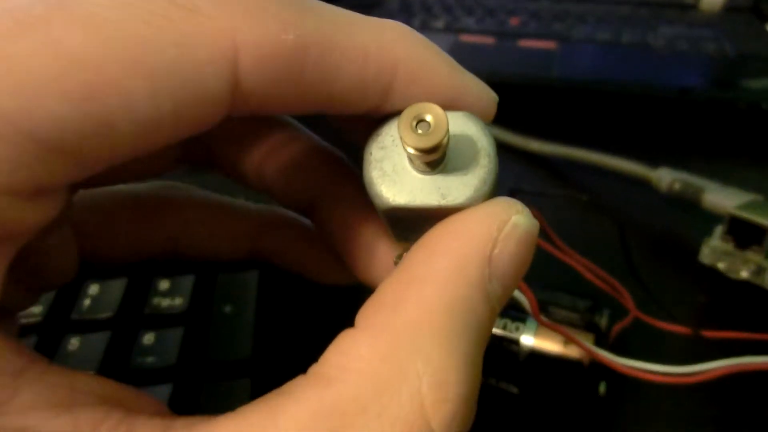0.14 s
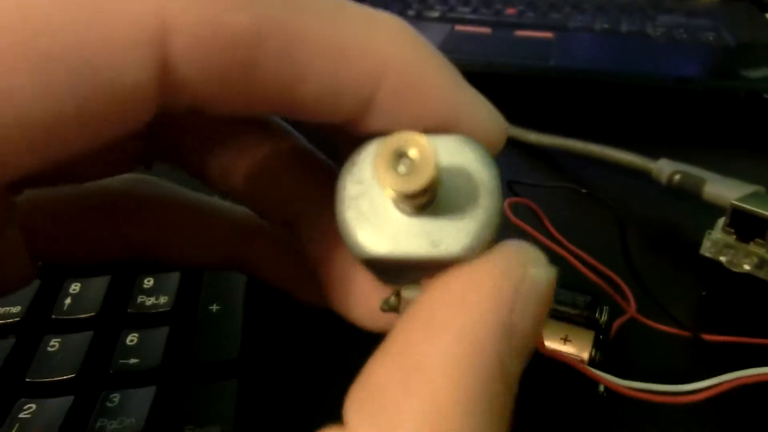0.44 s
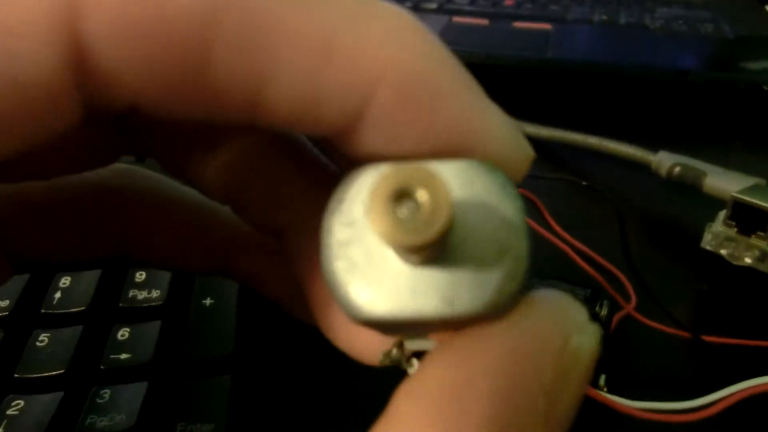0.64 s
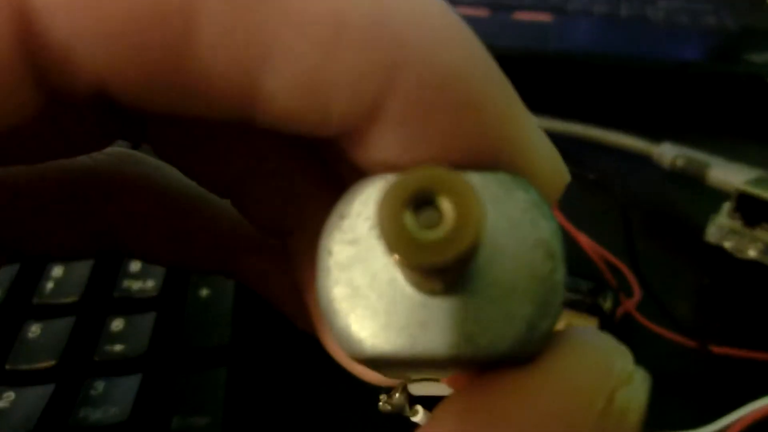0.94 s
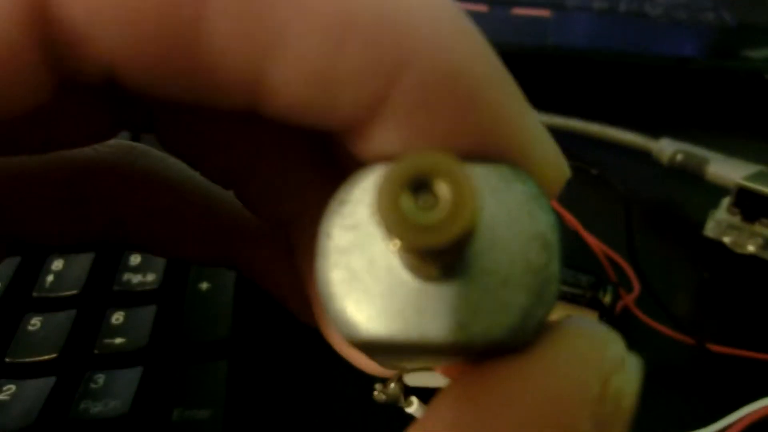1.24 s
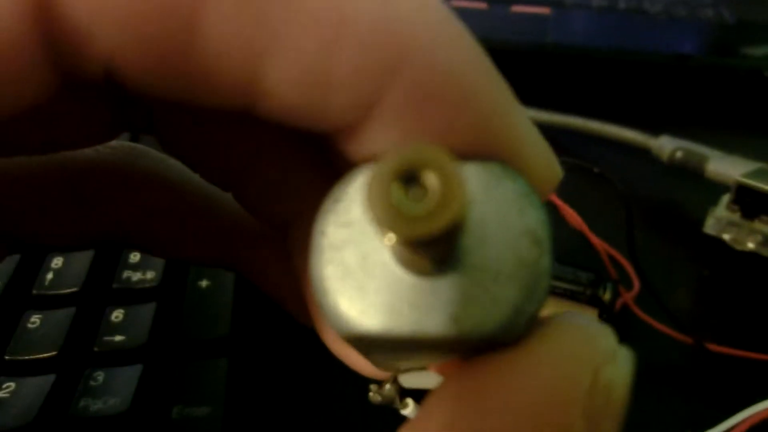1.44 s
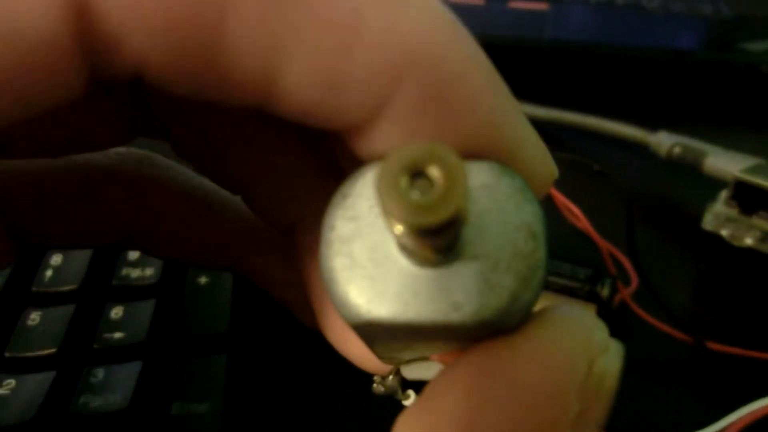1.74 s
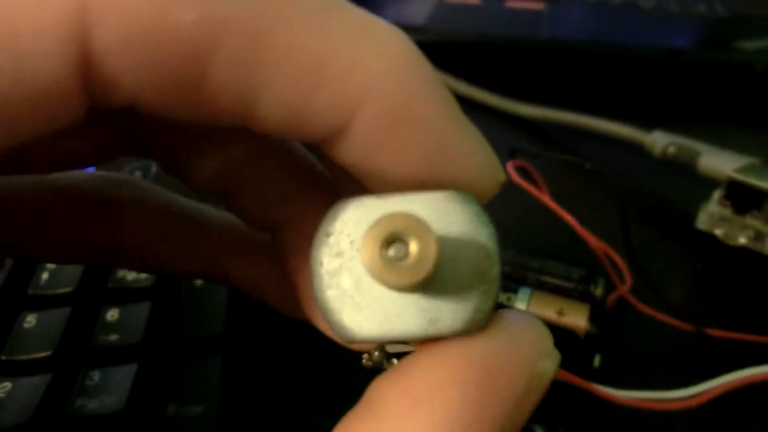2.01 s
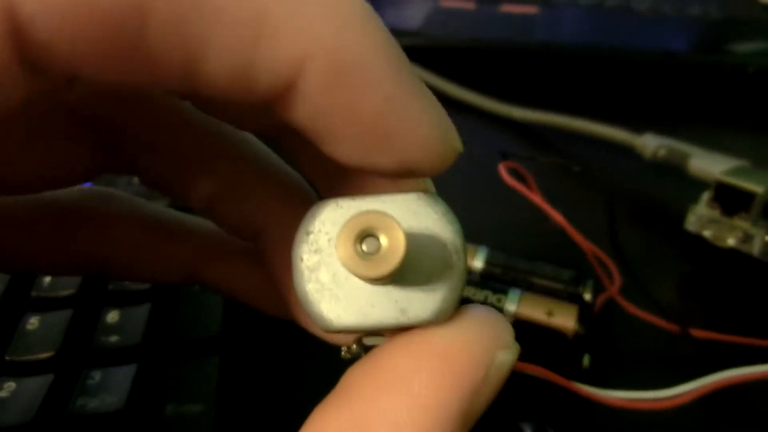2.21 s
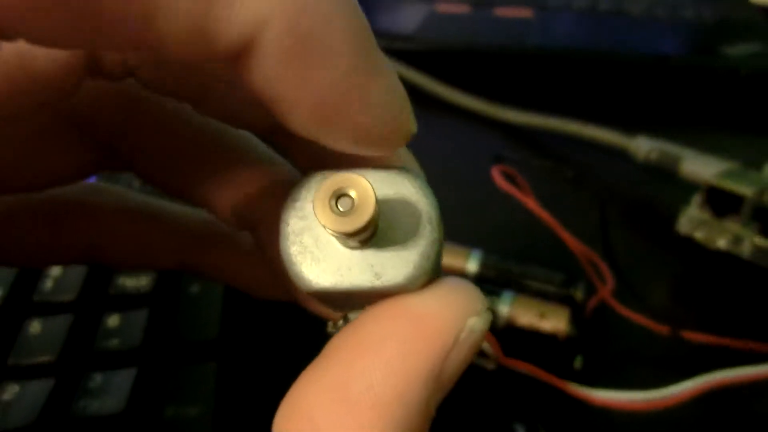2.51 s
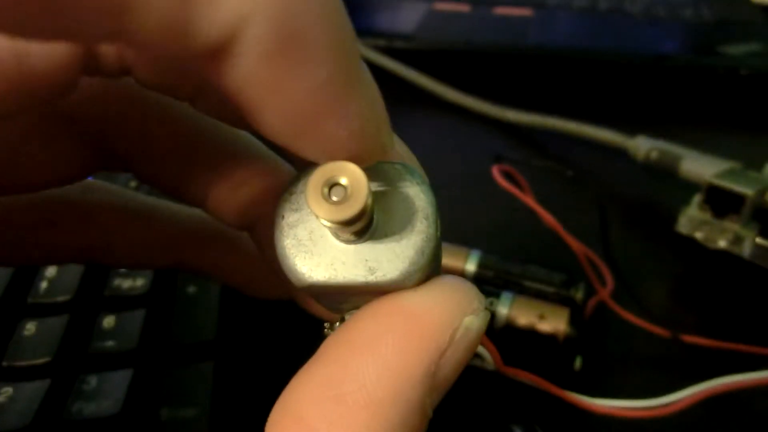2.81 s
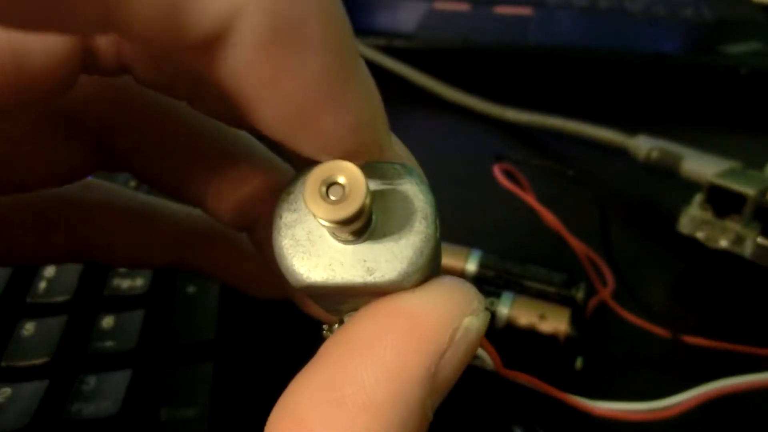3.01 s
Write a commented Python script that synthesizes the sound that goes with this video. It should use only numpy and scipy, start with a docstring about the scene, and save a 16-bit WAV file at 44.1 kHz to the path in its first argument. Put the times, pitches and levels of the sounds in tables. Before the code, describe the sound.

Small brushed electric motor whines high and hissy, climbing, sagging briefly, then climbing again

```python
"""A small brushed motor whines in a hand, louder on the left; it gathers speed, sags once and climbs again.
Whine: cosines at multiples (orders) of the shaft rate, the high ones sliding through the casing response.
Scrape: brush noise shaped by the same casing, puffing at three ticks a turn.
Room: quiet hiss that swells a little with the whine, steady rumble and one low hum."""
import sys
import numpy as np
from scipy import signal
from scipy.fft import rfft, irfft
from scipy.io import wavfile
from scipy.ndimage import uniform_filter1d

SR = 44100
rng = np.random.default_rng(int(sys.argv[2]) if len(sys.argv) > 2 else 0)


def store_wav(level_fs):
    """Save 16-bit WAV to argv[1]."""
    pcm = np.round(np.clip(np.atleast_2d(level_fs), -1, 1) * 32767)
    wavfile.write(sys.argv[1], SR, pcm.T.astype(np.int16))


N = 138915


def gain_of(db):
    """Amplitude factor of a level in dB."""
    return 10 ** (np.asarray(db) / 20)


def read(points, hz, col=1):
    """Table column at the given frequencies, interpolated over log frequency."""
    p = np.asarray(points, float)
    return np.interp(np.log(hz + 1), np.log(p[:, 0] + 1), p[:, col])


def control(table, col):
    """Table column as a curve over time, one value per sample."""
    p = np.asarray(table, float)
    return np.interp(np.arange(N) / SR, p[:, 0], p[:, col])


def chance(rate_hz):
    """Random curve of rms near 1: twelve sines from rate_hz / 8 to rate_hz."""
    t = np.arange(0, N + 128, 128) / SR
    hz = np.geomspace(rate_hz / 8, rate_hz, num=12)
    start_turns = rng.random(12)
    curve = np.sin(2 * np.pi * (hz * t[:, None] + start_turns)).sum(1) / np.sqrt(6)
    return np.interp(np.arange(N) / SR, t, curve)


def pair(level_db_per_hz, same, lean_db, lead_rad, gate):
    """Gated stereo noise; level, left-right likeness, balance and phase lead vary over frequency."""
    a, b = rfft(rng.standard_normal((2, N)) * gate, axis=1)
    same = np.clip(same, 0, 1)
    right = same * a + np.sqrt(1 - same ** 2) * b
    right = right * gain_of(-lean_db) * np.exp(-1j * lead_rad)
    return irfft(np.array([a, right]) * gain_of(level_db_per_hz) * np.sqrt(SR / 2), N, axis=1)


# brush ticks in one turn: place_turns, strength_db
TICKS = [(.09, 2.5), (.45, -7), (.78, -13)]
# motor balance: pitch_hz, left_over_right_db
MOTOR_LEAN = [(1000, 4.5), (1400, -1), (4300, 0), (5000, 5), (9000, 6.5), (11000, 9.5), (13000, 10),
              (15500, 10)]
# motor phase between ears: pitch_hz, left_leads_rad
MOTOR_LEAD = [(200, .01), (3000, 0.041), (9000, 0.12), (11000, 0.11), (12500, 1.), (15500, 1)]
WAVER_DB, FLUTTER_DB, SLIP_RAD = 2., 1.5, .35  # slow level, quick level and quick phase chance
STEADY_BELOW, BLUR_FROM = 9, 50  # orders: flutter is halved low down, phase slip grows high up
APART_DB, APART_RAD = 4, .55  # chance from ear to ear


def order(k, level_db, turns, speed_hz, waver_db):
    """One wavering shaft order, phased to one of the ticks, a little different at each ear."""
    hz = k * speed_hz[::64]
    tick_turns = TICKS[rng.integers(3)][0]

    def fine(values):
        return np.repeat(values, 64)[:N]

    flutter_db = FLUTTER_DB * np.clip(k / STEADY_BELOW - 1, .5, 1)
    left_db = level_db + waver_db * chance(2.95) + flutter_db * chance(30.)
    slip_rad = SLIP_RAD * max(k / BLUR_FROM, 1) ** 2
    left_rad = 2 * np.pi * k * (turns - tick_turns) + slip_rad * chance(30.) + 2 * chance(.98)
    right_rad = left_rad - fine(read(MOTOR_LEAD, hz)) + APART_RAD * chance(3.98)
    apart_db = APART_DB * waver_db / WAVER_DB
    right_db = left_db - fine(read(MOTOR_LEAN, hz)) + apart_db * chance(2.26)
    audible = k * speed_hz < SR / 2
    return np.sqrt(2) * gain_of([left_db, right_db]) * np.cos([left_rad, right_rad]) * audible


# motor course: start_s, whine_base_db, scrape_base_db_per_hz, scrape_top_over_rest_db
MOTOR = [(0.0, -52, -85, -3.0), (0.1, -50.5, -83, 2), (0.21, -50, -77.5, -8), (0.44, -52.5, -74.5, -1),
         (0.5, -51.5, -76.5, 5.5), (0.85, -51, -72.5, 2), (1.02, -49, -79.5, 1), (1.21, -49, -75.5, 1),
         (1.44, -48.5, -72, 3.5), (1.7, -47.5, -70.5, 4), (1.85, -48, -71, 3.0), (2.0, -51.5, -71, 1.5),
         (2.16, -52, -72, -1), (2.32, -49.5, -78.5, 3), (2.41, -52, -77.5, 0), (2.65, -53, -78.5, 8),
         (2.79, -53.5, -76.5, 1.5), (2.98, -54.5, -75.5, 5), (3.15, -50.5, -73.5, -2)]
# casing response: pitch_hz, whine_gain_db, scrape_gain_db
SHELL = [(7000, -5, -9), (7300, -12, -9), (7600, -11, -9), (7900, -11, -9), (8200, -3, -10), (8500, -3, -8),
         (8800, 0, -8), (9100, 2, -5), (9400, -3, -2), (9700, 1, -1), (10000, 5, -2), (10300, 6, 0),
         (10600, 7, 4), (10900, 6, 4), (11200, -3, 0), (11500, 2, 5), (11800, 0, 5), (12100, 4, 6),
         (12400, -3, 7), (12700, 0, 6), (13000, 2, 7), (13300, -1, 4), (13600, 5, 5), (13900, 2, 3),
         (14200, 3, 3), (14500, 2, 0), (14800, 2, 1), (15100, -3, -3), (15400, -7, -8), (15700, -7, -8)]
# high commutator orders: order, level_over_base_db, drift_db_per_s as the hand turns
TREBLE = [(30, -6, 0), (31, -2, 3), (32, -5, 3), (33, -6, -1), (34, -2, 2), (35, -6, 0), (37, -5, 2),
          (38, -5, 2), (41, -3, -2), (43, -1, -6), (44, 2, -2), (46, 2, -2), (47, -2, -1), (49, 5, -2),
          (50, 4, 0), (51, 4, -2), (52, 4, 4), (53, 2, 1), (54, 2, -2), (55, 2, 1), (56, 2, -3), (58, 3, 1),
          (59, 3, 1), (60, 1, -2), (61, 2, 1), (62, 0, 0), (63, 2, -2), (64, -2, 0), (65, 5, 4)]
# orders with their own level curves: order
LEAD_ORDERS = (3, 6, 9, 18, 27, 36, 39, 40, 42, 45, 48, 57)
# their base levels: start_s, then one level_db_rms per lead order
LEAD_LEVELS = [(0.0, -75.0, -70.0, -68.0, -69.0, -71.0, -71.0, -50.0, -68.0, -43.0, -40.0, -37.0, -54.0),
               (0.26, -75.0, -72.0, -61.0, -74.0, -70.0, -63.0, -44.0, -58.0, -38.0, -41.0, -29.0, -58.0),
               (0.48, -68.0, -65.0, -56.0, -61.0, -60.0, -56.0, -49.0, -51.0, -36.0, -37.0, -33.0, -47.0),
               (0.58, -72.0, -60.0, -55.0, -66.0, -60.0, -58.0, -44.0, -52.0, -50.0, -42.0, -31.0, -44.0),
               (0.78, -66.0, -66.0, -52.0, -61.0, -67.0, -54.0, -50.0, -56.0, -38.0, -39.0, -42.0, -37.0),
               (0.84, -67.0, -64.0, -53.0, -60.0, -62.0, -52.0, -54.0, -65.0, -41.0, -36.0, -41.0, -44.0),
               (1.12, -69.0, -64.0, -49.0, -62.0, -59.0, -49.0, -53.0, -54.0, -37.0, -37.0, -43.0, -37.0),
               (1.2, -60.0, -68.0, -56.0, -69.0, -69.0, -49.0, -53.0, -51.0, -39.0, -34.0, -40.0, -41.0),
               (1.3, -64.0, -67.0, -52.0, -64.0, -60.0, -44.0, -57.0, -55.0, -40.0, -33.0, -41.0, -34.0),
               (1.58, -63.0, -63.0, -53.0, -70.0, -53.0, -48.0, -52.0, -39.0, -37.0, -44.0, -46.0, -40.0),
               (1.8, -63.0, -62.0, -58.0, -63.0, -52.0, -44.0, -44.0, -38.0, -40.0, -45.0, -43.0, -39.0),
               (1.92, -62.0, -62.0, -59.0, -62.0, -53.0, -44.0, -50.0, -47.0, -44.0, -39.0, -44.0, -50.0),
               (1.96, -71.0, -66.0, -57.0, -64.0, -51.0, -59.0, -46.0, -46.0, -47.0, -42.0, -41.0, -58.0),
               (2.1, -63.0, -64.0, -57.0, -68.0, -60.0, -67.0, -48.0, -51.0, -42.0, -30.0, -47.0, -46.0),
               (2.14, -76.0, -68.0, -62.0, -66.0, -61.0, -65.0, -48.0, -54.0, -47.0, -30.0, -55.0, -48.0),
               (2.24, -67.0, -60.0, -62.0, -66.0, -68.0, -59.0, -49.0, -50.0, -48.0, -34.0, -56.0, -54.0),
               (2.36, -71.0, -64.0, -60.0, -66.0, -64.0, -67.0, -49.0, -49.0, -47.0, -30.0, -45.0, -59.0),
               (2.68, -76.0, -63.0, -62.0, -64.0, -57.0, -62.0, -45.0, -51.0, -47.0, -44.0, -51.0, -51.0),
               (2.92, -73.0, -62.0, -61.0, -63.0, -54.0, -53.0, -44.0, -63.0, -50.0, -41.0, -48.0, -46.0),
               (2.98, -68.0, -60.0, -58.0, -59.0, -61.0, -51.0, -45.0, -49.0, -45.0, -39.0, -43.0, -40.0),
               (3.15, -77.0, -57.0, -69.0, -60.0, -67.0, -43.0, -41.0, -51.0, -45.0, -39.0, -47.0, -42.0)]
# faint orders between: order, base_db_rms, drift_db_per_s
FAINT = [(1, -64, 0), (5, -73, -4), (12, -62, 3.5), (15, -69, 1), (21, -68, 2)]
DRIFT_MID_S = 1.6  # drifts cross zero here
LEAD_WAVER_DB, FAINT_WAVER_DB = .6, 1.
FAINT_FOLLOW = .3  # dB per dB of whine


def whine(turns, speed_hz):
    """High orders slide through the casing response; lead and faint orders have their own levels."""
    base_db = control(MOTOR, col=1)
    since_s = np.arange(N) / SR - DRIFT_MID_S
    out = np.zeros((2, N))
    for k, db, drift in TREBLE:
        level_db = base_db + db + drift * since_s + read(SHELL, k * speed_hz)
        out += order(k, level_db, turns, speed_hz, WAVER_DB)
    for i, k in enumerate(LEAD_ORDERS):
        out += order(k, control(LEAD_LEVELS, col=1 + i), turns, speed_hz, LEAD_WAVER_DB)
    follow_db = FAINT_FOLLOW * (base_db - base_db.mean())
    for k, db, drift in FAINT:
        out += order(k, db + follow_db + drift * since_s, turns, speed_hz, FAINT_WAVER_DB)
    return out


# scrape likeness between ears: pitch_hz, likeness_0_to_1
SCRAPE_SAME = [(3000, 0.77), (9000, 0.34), (11000, 1), (13000, 0.3), (15500, 0.55)]
TICK_TURNS, TICK_SHARE, TICK_SCATTER_DB = .12, .36, 2.  # decay, share of the gate, size spread
ROLL_DB, ROLL_HZ = 10.5, 8800  # fall per octave below this pitch
SPLIT_HZ = 12500  # the top above it has its own level


def scrape(turns):
    """Brush hiss through the casing that puffs at each tick, every tick of a different size."""
    hz = np.fft.rfftfreq(N, 1 / SR)
    colour_db = read(SHELL, hz, col=2) + ROLL_DB * np.minimum(np.log2((hz + 1) / ROLL_HZ), 0)
    size = gain_of(TICK_SCATTER_DB * np.clip(rng.standard_normal((1000, 3)), -2, 2))
    puffs = np.zeros(N)
    for i, (place, db) in enumerate(TICKS):
        since_turns = turns - place
        decay = np.exp(-(since_turns % 1) / TICK_TURNS)
        puffs += gain_of(db) * size[(since_turns + 1).astype(int), i] * decay
    gate = 1 - TICK_SHARE + TICK_SHARE * puffs / puffs.mean()
    gate = gate / np.sqrt(np.mean(gate ** 2))
    gate = gate * gain_of(control(MOTOR, col=2) + .9 * chance(8.))
    hiss = pair(colour_db, read(SCRAPE_SAME, hz), read(MOTOR_LEAN, hz), read(MOTOR_LEAD, hz), gate)
    top = irfft(rfft(hiss, axis=1) * (hz > SPLIT_HZ), N, axis=1)
    return hiss - top + top * gain_of(control(MOTOR, col=3))


# hiss and rumble at left, before AIR_GAIN: pitch_hz, level_db_per_hz
AIR = [(20, -82), (45, -75.5), (80, -78.5), (105, -74), (135, -72), (170, -81.5), (230, -80), (350, -82.5),
       (700, -82.5), (1500, -83.5), (2500, -83), (4500, -85), (7000, -84.5), (9000, -83)]
# room likeness between ears: pitch_hz, likeness_0_to_1
ROOM_SAME = [(60, 0.72), (130, 0.79), (290, 0.33), (640, 0.11), (1410, 0.27), (3100, 0.39), (6820, 0.11),
             (15000, 0.58)]
# room balance: pitch_hz, left_over_right_db
ROOM_LEAN = [(60, -0.5), (130, 3.5), (290, 5), (640, 5), (1410, 5.5), (3100, 3), (6820, 7.5), (15000, -11)]
AIR_GAIN = .82
HUM_HZ, HUM_DB, HUM_LEAN_DB, HUM_WAVER_DB = 56.2, -53, 1.5, .8  # level is rms at left
WHIR_HZ, WHIR_FOLLOW = 500, .25  # above this pitch the hiss follows the whine, dB per dB


def room():
    """Noise whose hiss swells a little with the whine over steady rumble, and one wavering sine hum."""
    hz, t = np.fft.rfftfreq(N, 1 / SR), np.arange(N) / SR
    level_db = read(AIR, hz) - 10. * np.maximum(np.log2((hz + 1) / 9000), 0)
    air = pair(level_db, read(ROOM_SAME, hz), read(ROOM_LEAN, hz), 0, AIR_GAIN)
    upper = irfft(rfft(air, axis=1) * (hz > WHIR_HZ), N, axis=1)
    whine_db = control(MOTOR, col=1)
    swell = gain_of(WHIR_FOLLOW * (whine_db - whine_db.mean()))
    hum_gain = np.sqrt(2) * gain_of(HUM_DB + HUM_WAVER_DB * chance(4.64))
    hum = hum_gain * np.sin(2 * np.pi * HUM_HZ * t)
    return air + upper * (swell - 1) + hum * gain_of([[0], [-HUM_LEAN_DB]])


# shaft speed: start_s, speed_turns_per_s
SPEED = [(0.0, 216.11), (0.06, 217.37), (0.1, 219.1), (0.21, 220.46), (0.44, 224.61), (0.5, 225.98),
         (0.85, 230.42), (1.02, 233.2), (1.21, 237.26), (1.44, 242.82), (1.7, 246.65), (1.85, 248.36),
         (1.91, 248.09), (2.0, 245.91), (2.05, 242.55), (2.16, 237.69), (2.2, 237.21), (2.32, 237.5),
         (2.41, 239.81), (2.65, 243.9), (2.79, 249.62), (2.88, 251.56), (2.98, 255.01), (3.15, 259.6)]


def scene():
    """One smoothed shaft speed drives whine and scrape; the room is added."""
    speed_hz = uniform_filter1d(control(SPEED, col=1), size=800)
    turns = np.cumsum(speed_hz) / SR
    return whine(turns, speed_hz) + scrape(turns) + room()


# dips in the microphone's treble: pitch_hz, width_hz, share_removed
DIPS = [(12500, 130, .9), (15290, 200, .8)]
EDGE_HZ = 15650


def record(dry):
    """Two narrow dips in the microphone's treble, then a low-pass band limit."""
    hz = np.fft.rfftfreq(N, 1 / SR)
    dip = np.ones(len(hz))
    for at_hz, width_hz, share in DIPS:
        dip *= 1 - share / (1 + (2 * (hz - at_hz) / width_hz) ** 2)
    x = irfft(rfft(dry, axis=1) * dip, N, axis=1)
    low_pass = signal.firwin(511, EDGE_HZ, window=("kaiser", 9), fs=SR)
    return signal.oaconvolve(x, low_pass[None], "same")


dry = scene()
out = record(dry)
store_wav(out)
```